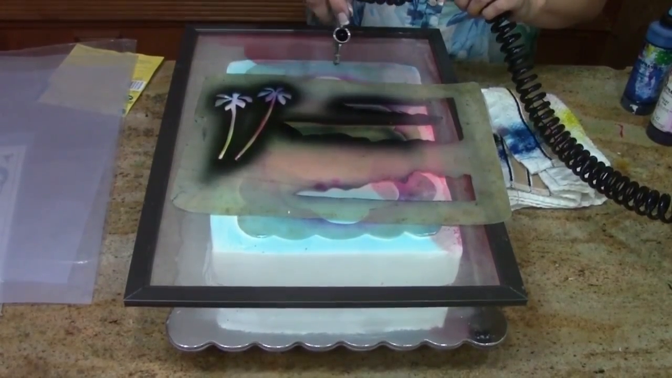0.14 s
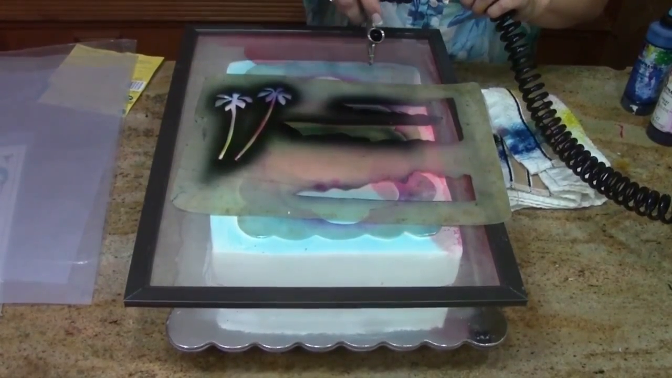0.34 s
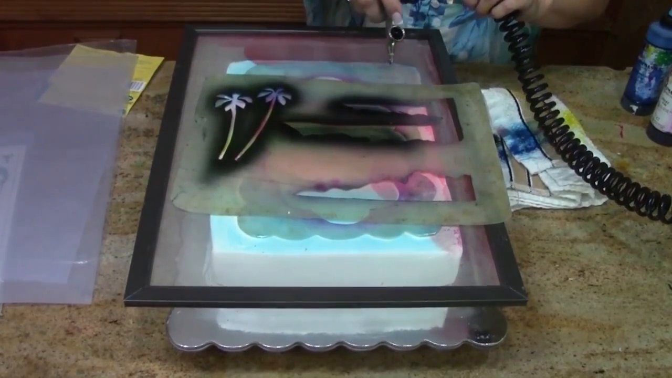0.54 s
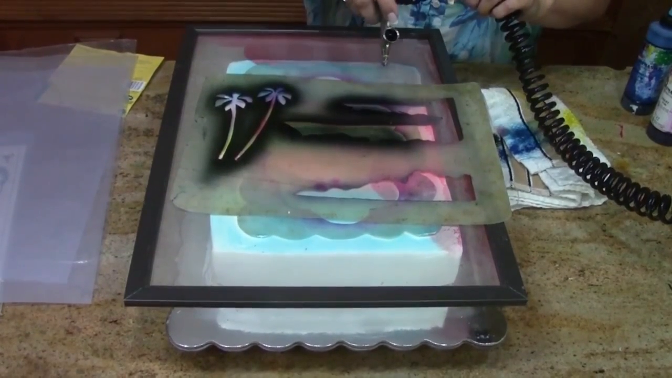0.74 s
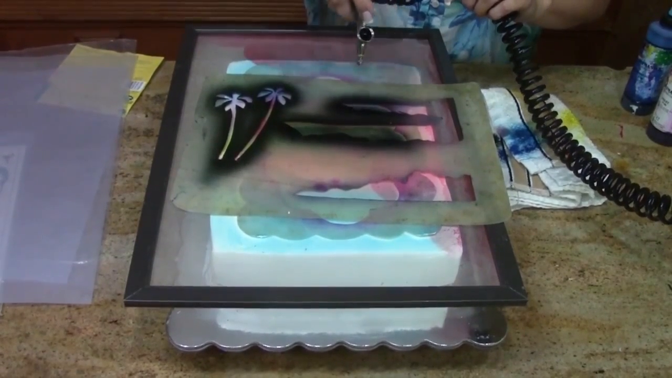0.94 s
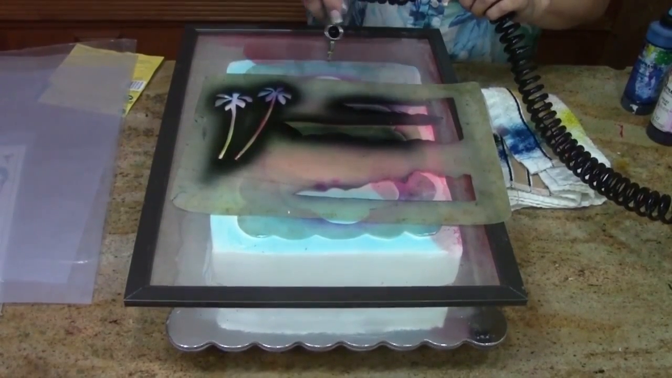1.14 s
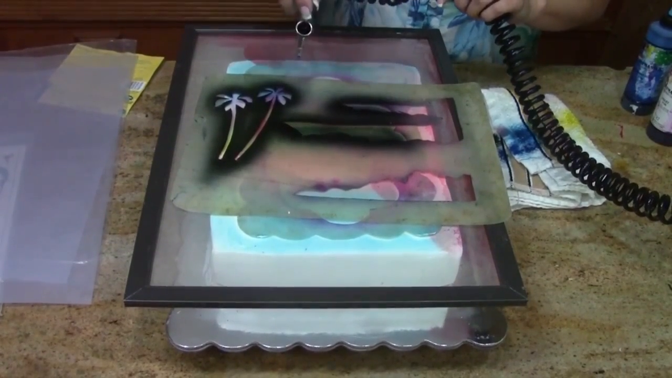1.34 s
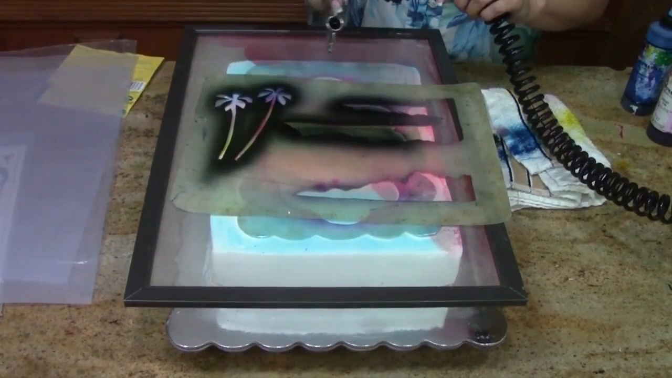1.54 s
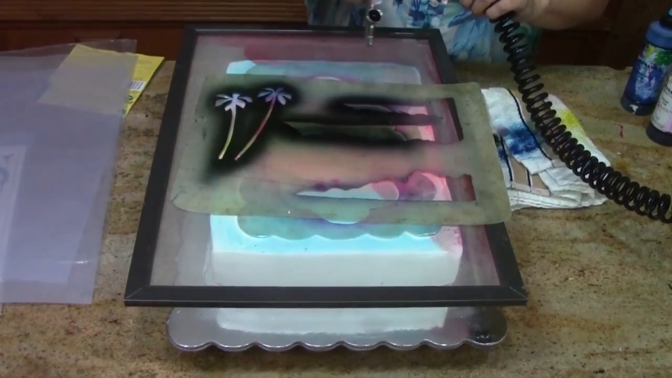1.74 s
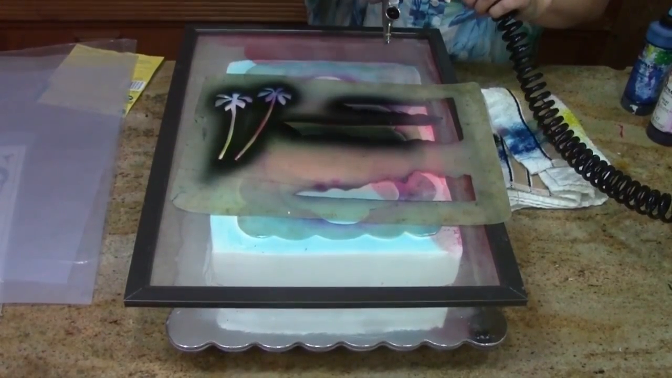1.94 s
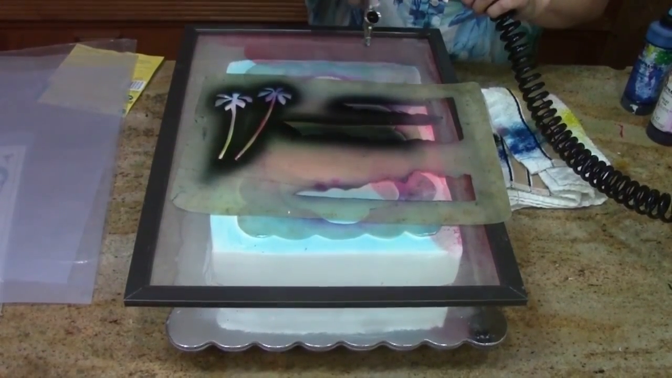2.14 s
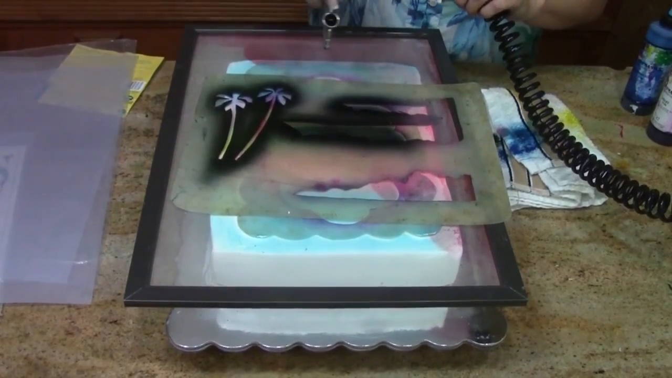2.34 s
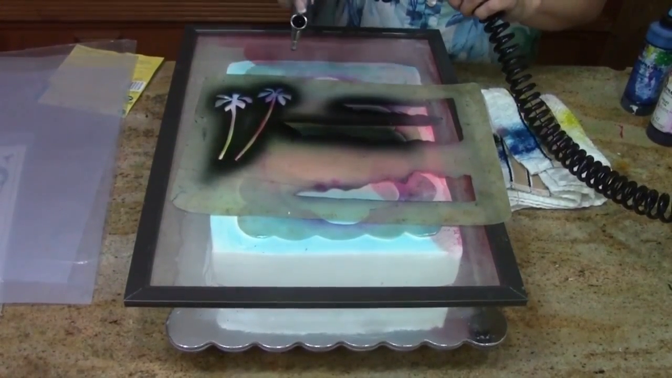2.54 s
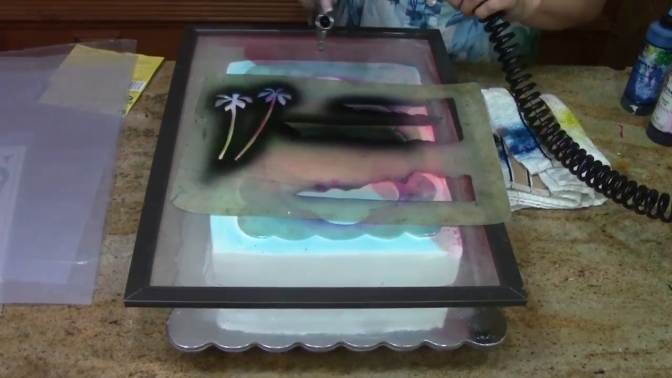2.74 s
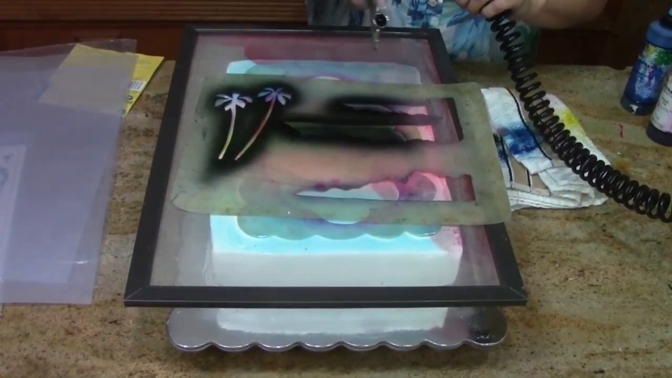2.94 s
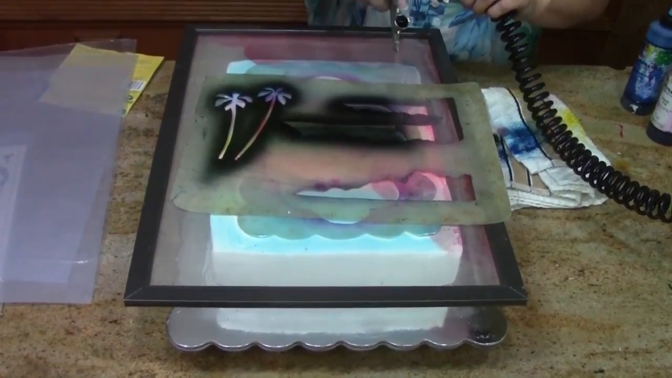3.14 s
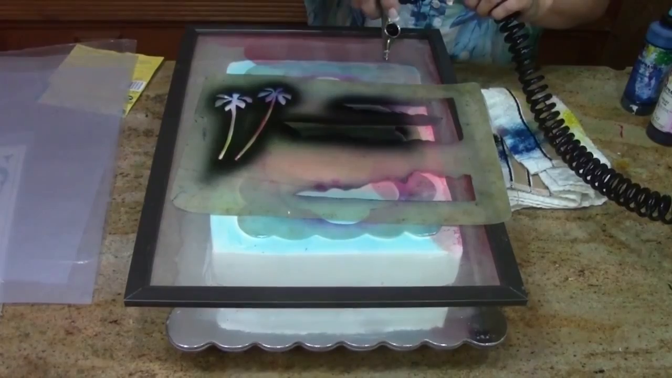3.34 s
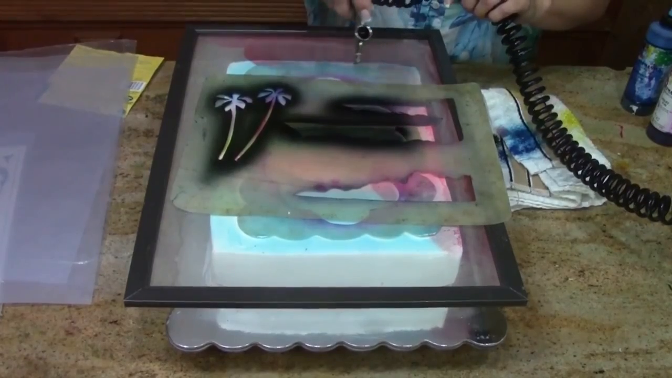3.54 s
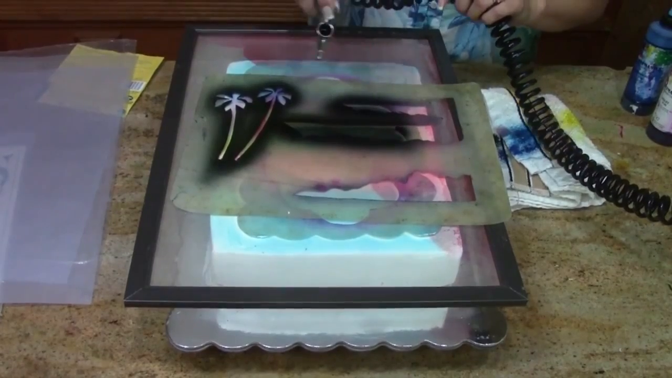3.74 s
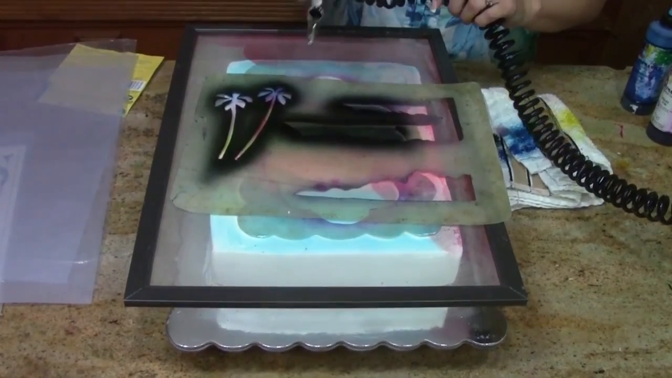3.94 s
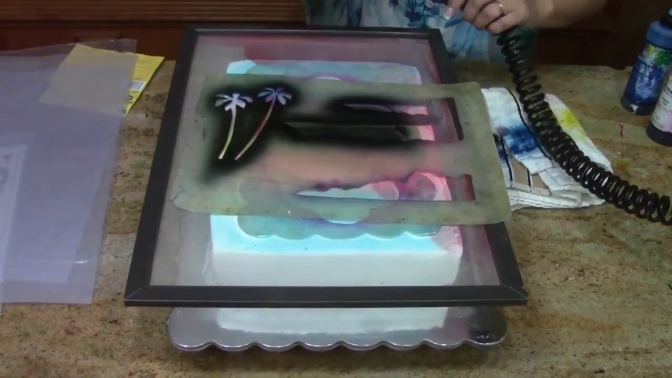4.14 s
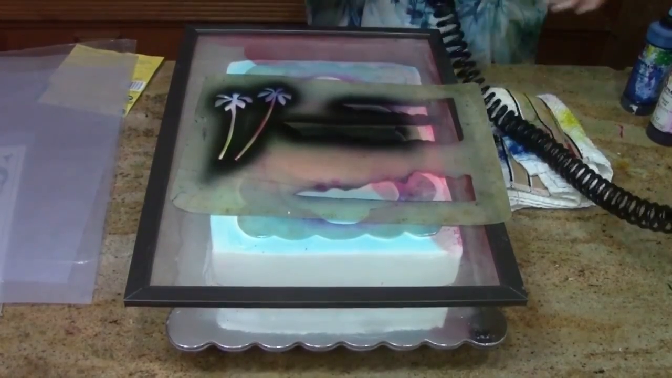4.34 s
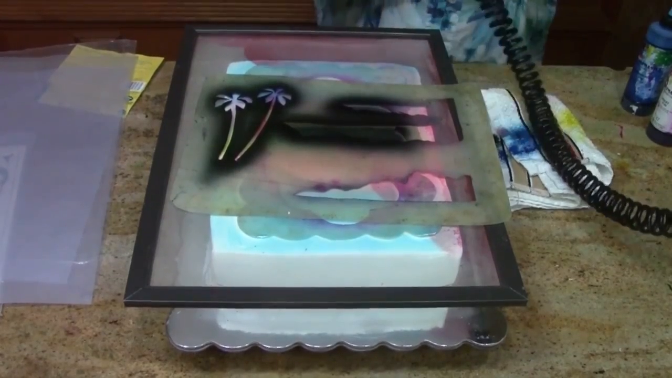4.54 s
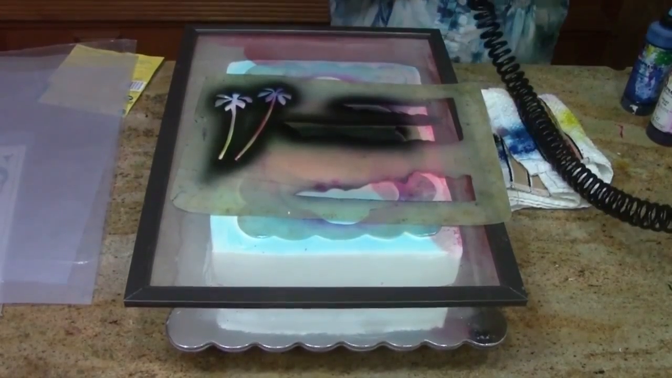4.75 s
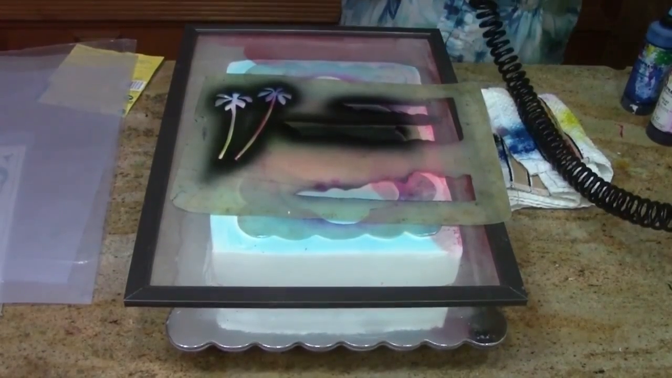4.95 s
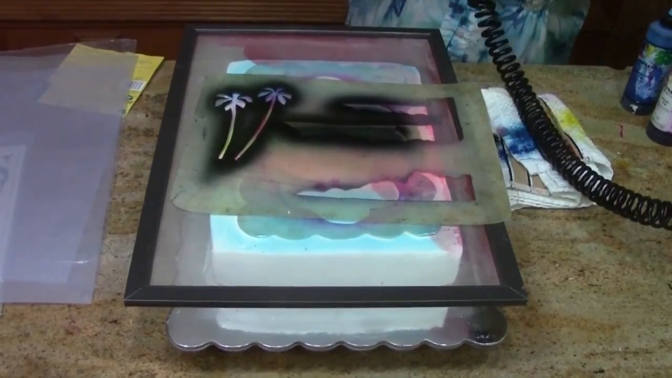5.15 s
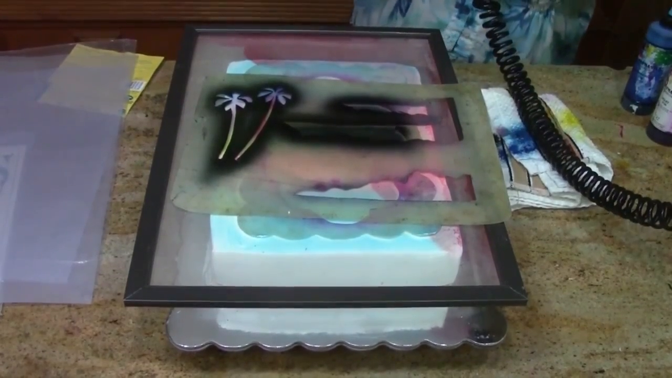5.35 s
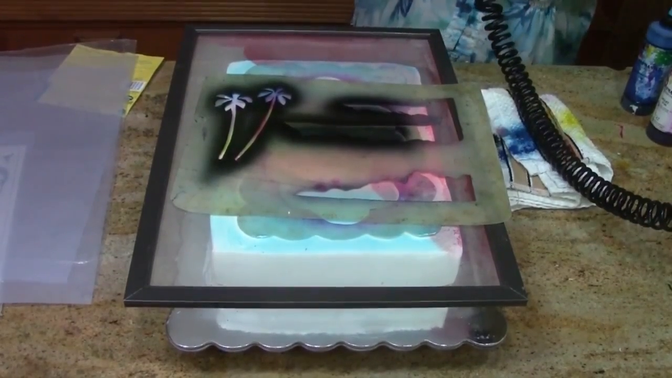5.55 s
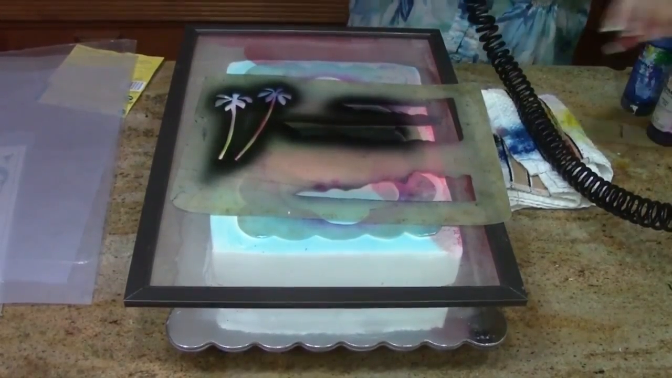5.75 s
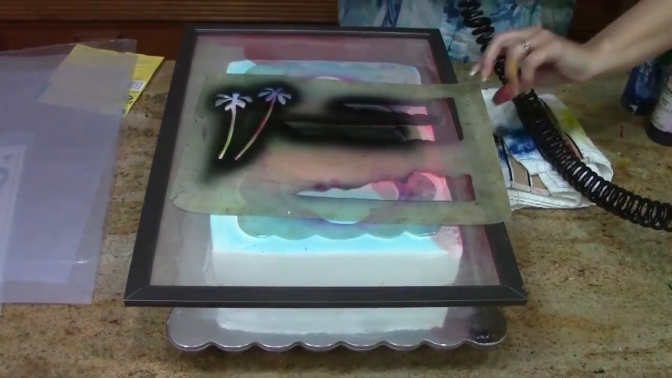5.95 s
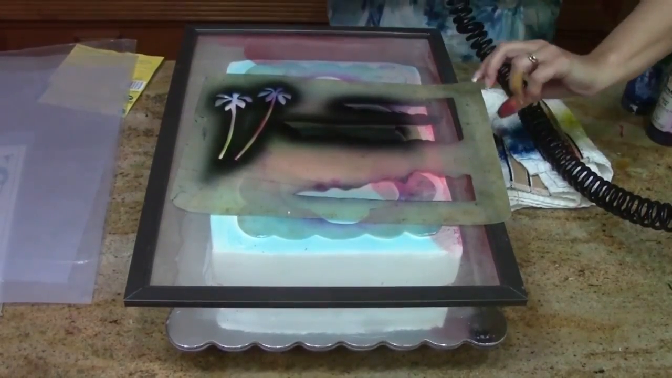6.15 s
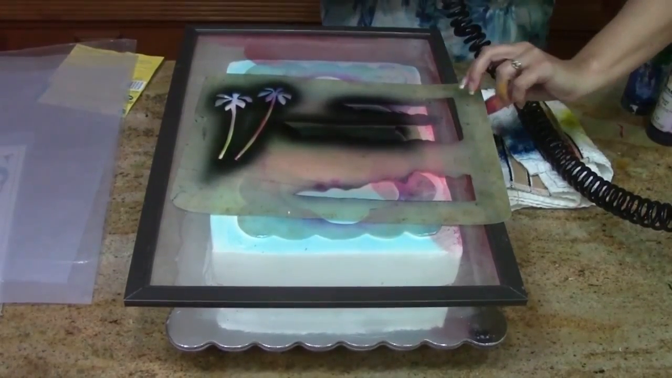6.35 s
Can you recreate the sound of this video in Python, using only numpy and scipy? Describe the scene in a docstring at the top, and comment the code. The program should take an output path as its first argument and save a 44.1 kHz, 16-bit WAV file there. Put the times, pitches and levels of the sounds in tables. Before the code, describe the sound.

In a quiet workroom, a small compressor hums and rattles steadily straight ahead while a close airbrush sprays with a bright hiss in about six sweeps. The airbrush is put aside and its hiss turns duller and more fluttery. Then a switch clicks, the motor winds down with brief honks, and one hard clack follows. Leftover air leaks softly from the hose and fades into room tone.

```python
"""An airbrush hisses close to the microphone, swept over a stencil on a cake in a workroom.
Its small diaphragm compressor, straight ahead too, drones and throbs as each turn knocks valves and casing.
The airbrush is put aside, and the pump strokes pulse the air harder once the hose pressure sags.
The pump is switched off and runs down with a few honks, something hard clacks once,
and the last air drains away over faint hums and room tone."""
import sys
import numpy as np
from scipy import signal
from scipy.fft import rfft, irfft, next_fast_len
from scipy.io import wavfile

SR = 44100
rng = np.random.default_rng(int(sys.argv[2]) if len(sys.argv) > 2 else 0)


def transcribe(signal):
    """Save signal, clipped to [-1, 1], as a 16-bit WAV file at the path in sys.argv[1]."""
    frames = np.atleast_2d(signal).T
    limited = np.clip(frames, -1, 1)
    pcm = np.round(limited * 32767).astype(np.int16)
    wavfile.write(sys.argv[1], SR, pcm)


N = 285760
TIME = np.arange(N) / SR
ASIDE_S, STOP_S = 4.01, 5.27   # the airbrush is put aside; the pump stops being driven
TURNS_PER_S = 27.924


# Hiss of the nozzle, close up: frequency_hz, density_db
NOZZLE_HISS = [(4500, -24.5), (6200, -12), (7200, -4), (8700, 2.5), (9600, 2.5), (10600, 2.5),
               (12000, -8.5)]
# Sizzle at the top of the jet: frequency_hz, density_db
TOP_SIZZLE = [(7500, -2), (9300, -25), (10000, 2), (10800, 5.5), (11500, 5), (12000, -3.5)]
def airbrush(turns):
    """A turbulent jet, louder on the stencil; with the hose slack, each pump stroke comes as a puff."""
    on_stencil, hiss_power, sizzle_power, rush_power = sweeps()
    aside = ramp(ASIDE_S, 0.81)
    puff = np.tanh(3 * (np.cos(2 * np.pi * (turns - .82)) - .35))
    taut_db, slack_db = 0.8, 3
    puff_db = (taut_db + (slack_db - taut_db) * aside) * (puff - puff.mean())
    treble_db = -4.5 * aside + 0.5 * drift(38)   # flutters, and drops once put aside
    jet = 0
    for free_air_db, power, spectrum in [(-40.5, hiss_power, NOZZLE_HISS), (-45.5, sizzle_power, TOP_SIZZLE)]:
        level = np.sqrt(from_db(free_air_db) ** 2 + power)
        jet += level * from_db(1.13 * drift(6.2)) * noise(spectrum, side_db=-47.5)
    jet *= from_db(puff_db + treble_db)
    body = rush(rush_power) * from_db(0.49 * puff_db - 0.5 * aside)
    body += splash(on_stencil) * from_db(treble_db)
    return (jet + body) * fade(STOP_S, 180)


# Passes of the jet over the stencil: start_s, end_s, hiss_db, sizzle_above_hiss_db, rush_db
STENCIL_SWEEPS = [(-0.1, 0.664, -39.5, 0.5, -43), (0.808, 1.28, -37.5, -4, -43.5),
                  (1.44, 1.993, -41, 1.5, -44), (2.167, 3.07, -48.5, 5.5, -43.5),
                  (3.1, 3.394, -41.5, -8, -42), (3.49, 4.053, -36.5, -4, -42.5)]
def sweeps(attack_s=0.1, release_s=0.078):
    """How fully the jet is on the stencil, and the power of the hiss, sizzle and rush it raises there."""
    on_stencil, hiss_power, sizzle_power, rush_power = np.zeros((4, N))
    for start_s, end_s, hiss_db, sizzle_above_hiss_db, rush_db in STENCIL_SWEEPS:
        gate = ramp(start_s - attack_s / 2, attack_s) * (1 - ramp(end_s - release_s / 2, release_s))
        on_stencil += gate
        hiss_power += gate * from_db(hiss_db) ** 2
        sizzle_power += gate * from_db(hiss_db + sizzle_above_hiss_db) ** 2
        rush_power += gate * from_db(rush_db) ** 2
    return on_stencil, hiss_power, sizzle_power, rush_power


# Broad rush of the air: frequency_hz, density_db
AIR_RUSH = [(900, 3), (1800, -1), (2500, -0.5), (3900, 1), (4700, 1.5), (5400, 0.5), (6300, 4), (7500, 3),
            (10000, -2)]
# Hollow tones of airbrush and stencil: pitch_hz, width_hz, gain_db
HOLLOW_TONES = [(2830, 45, -11), (4650, 37, 1.5), (4880, 43, 0), (5670, 47, -13)]
def rush(sweep_power, free_air_db=-43):
    """The rushing air excites hollow tones in the airbrush and stencil."""
    flow = noise(AIR_RUSH)
    hollows = sum(from_db(db) * resonance(flow, hz, width_hz) for hz, width_hz, db in HOLLOW_TONES)
    return np.sqrt(from_db(free_air_db) ** 2 + sweep_power) * (flow + hollows)


# Midrange splash of the jet: frequency_hz, density_db
AIR_SPLASH = [(1200, 1), (1950, -4.5), (2350, 2), (2750, -2), (3100, 1.5), (3700, -9), (5000, -13)]
# The jet catches a stencil edge: peak_s, half_length_s, level_db
EDGE_CATCHES = [(0.035, 0.032, -37.5), (1.417, 0.12, -43.5), (2.74, 0.11, -43.5)]
def splash(on_stencil, free_air_db=-48.5, sweep_db=-53.5):
    """The air splashes a little more on every sweep and flares where it catches an edge."""
    edge_power = sum((from_db(db) * swell(s, half_s)) ** 2 for s, half_s, db in EDGE_CATCHES)
    power = from_db(free_air_db) ** 2 + on_stencil * from_db(sweep_db) ** 2 + edge_power
    return np.sqrt(power) * noise(AIR_SPLASH)


# Short swells of noise, straight ahead: two spurts of air, then a faint scrape: peak_s, half_length_s,
# level_db, centre_hz, octave_away_db
NOISE_BURSTS = [(3.254, 0.017, -27.5, 10300, -16), (5.28, 0.031, -45, 5630, -24),
                (5.536, 0.015, -51, 1990, -21)]
def bursts():
    """Brief swells of noise, each around its own pitch: spurts of air, and a faint scrape near 2 kHz."""
    return sum(from_db(db) * swell(s, half_s) * noise([(hz / 2, skirt_db), (hz, 0), (hz * 2, skirt_db)])
               for s, half_s, db, hz, skirt_db in NOISE_BURSTS)


# Harmonics of the compressor's turning rate: multiple, relative_db
DRONE_HARMONICS = [(1, -21), (2, -18), (3, -12), (4, -13), (5, -33), (6, -5), (7, -8), (8, -11), (9, -13),
                   (10, -5), (11, -11), (12, -14), (13, -7), (14, -1), (15, -14), (16, -9), (17, -19),
                   (18, -13), (19, -33), (20, -21), (21, -10), (22, -14), (23, -16), (24, -2), (25, -2),
                   (26, 0), (27, -11), (28, -9), (29, -26), (30, -13), (31, -28), (32, -20), (33, -24),
                   (34, -23), (35, -10), (36, -12), (37, -15), (38, -14), (39, -22), (40, -24), (41, -22),
                   (42, -11), (43, -13), (44, -25), (45, -17), (46, -18), (47, -19), (48, -17), (49, -25),
                   (50, -22), (51, -30), (52, -27), (53, -22), (54, -8), (55, -13), (56, -32), (57, -19),
                   (58, -19)]
# Parts of the pump that sound in turn: lowest_hz, moment_turns, scatter_rad
PUMP_PARTS = [(20, .15, 2.5), (350, .53, .9), (460, .3, 1.8), (655, .34, .25), (740, .2, 1.6),
              (1420, .3, .6)]
def pump_drone(turns):
    """Each turn knocks the valves and the casing one after another; no two turns are quite alike."""
    shaky_turns = turns + .0009 * drift(12)
    lowest_hz, moment_turns, scatter_rad = np.transpose(PUMP_PARTS)
    drone = np.zeros(N)
    for multiple, (_, relative_db) in enumerate(DRONE_HARMONICS, 1):
        part = max(np.searchsorted(lowest_hz, multiple * TURNS_PER_S) - 1, 0)
        angle = 2 * np.pi * multiple * (shaky_turns - moment_turns[part])
        angle += scatter_rad[part] * rng.standard_normal()
        drone += from_db(relative_db + .5 * drift(6.9)) * np.cos(angle)
    lift_db = 0.28 + 0.75 * ramp(ASIDE_S, STOP_S - ASIDE_S)   # a little louder with the airbrush aside
    return from_db(lift_db) * rms_one(drone) * fade(STOP_S, 200)


# Irregular rattle of the pump: frequency_hz, density_db
PUMP_RATTLE = [(30, -14), (130, -9.5), (300, -6.5), (520, -4), (730, -1), (900, -26), (1100, 0.5),
               (1270, 2.5), (1450, -7.5), (1750, -12), (2000, -49)]
def pump_rattle(turns):
    """A rattle throbs once a turn and rings the casing; both die away after the switch-off."""
    rattle = noise(PUMP_RATTLE) * (1 + .3 * np.cos(2 * np.pi * (turns - .22)))
    casing = rms_one(ring(rattle, hz=753.5, width_hz=28))
    return (from_db(-11.5) * rattle + from_db(-18.5) * casing) * fade(STOP_S, 77)


def crank(coast_s):
    """Turns the pump has made so far: steady, then coasting towards rest."""
    speed = TURNS_PER_S * np.clip(1 - (TIME - STOP_S) / coast_s, 0, 1)
    return np.cumsum(speed) / SR


def coasting(turns, level_db, db_per_s, blur_hz, multiple):
    """The motor's strongest low tone lingers, blurred, and sinks as it slows."""
    angle = 2 * np.pi * multiple * turns
    tone = drift(blur_hz) * np.sin(angle) + drift(blur_hz) * np.cos(angle)
    return from_db(level_db) * ramp(STOP_S, 0.094) * fade(STOP_S, db_per_s) * tone


# Honks at the coasting pump's intake: start_s, length_s, pitch_hz, fundamental_db, second_relative_db
INTAKE_HONKS = [(5.324, 0.062, 375, -51, 9), (5.367, 0.05, 393, -32, -12), (5.394, 0.043, 378, -55, 12.5),
                (5.445, 0.059, 394, -47, -3), (5.507, 0.041, 360, -53, -3)]
def honks(sag, fourth_db, roughness, rasp_db):
    """The last slow strokes draw air through the intake reed, each rasping and sagging in pitch."""
    out = np.zeros(N)
    waver = roughness * drift(61.5)
    for start_s, length_s, pitch_hz, fundamental_db, second_db in INTAKE_HONKS:
        along = np.clip((TIME - start_s) / length_s, 0, 1)
        angle = 2 * np.pi * np.cumsum(pitch_hz * (1 - sag * (along - .5) + waver)) / SR
        overtones = from_db(second_db) * np.sin(2 * angle) + from_db(fourth_db) * np.sin(4 * angle)
        tone = np.sin(angle) + overtones * from_db(rasp_db * drift(89))
        out += from_db(fundamental_db) * np.abs(np.sin(np.pi * along ** 0.72)) * tone
    return out


# The switch, a tick and a hard clack, out in the room: start_s, force_db
CLACK_HITS = [(5.2592, -5), (5.449, -22), (5.5947, 0)]
# Modes that each hit rings: pitch_hz, width_hz, gain_db
STRUCK_MODES = [(1340, 450, -2), (2410, 580, 2.5), (3130, 690, 2.5), (3670, 890, -3), (4450, 980, 1),
                (5400, 1500, -6), (6660, 970, 2), (9700, 4000, -3.5)]
def clacks(gain_db, contact_s, grit_db):
    """A sharp contact with a little grit rings a few well damped modes."""
    force = np.zeros(N)
    for start_s, force_db in CLACK_HITS:
        grit = rng.standard_normal(N) * np.exp(-np.abs(TIME - start_s) / contact_s) * (TIME >= start_s)
        force += from_db(force_db + grit_db) * grit / np.linalg.norm(grit)
        force[round(start_s * SR)] += from_db(force_db)
    # neighbouring modes swing in opposite directions and merge into one broad clack
    modes = [(-1) ** k * from_db(db) * ring(force, hz, width_hz)
             for k, (hz, width_hz, db) in enumerate(STRUCK_MODES)]
    return from_db(gain_db) * sum(modes)


# Air draining from the hose, close up: frequency_hz, density_db
HOSE_LEAK = [(500, -0.5), (1200, -2.5), (1800, -5), (2500, -4), (4000, -4.5), (6000, -2.5), (8300, -2),
             (9500, -1.5), (10500, -1), (12000, -3.5)]
def leak(level_db, attack_s, db_per_s):
    """Once the pump stops, the air left in the hose escapes, ever more weakly."""
    envelope = ramp(STOP_S - attack_s, attack_s) * fade(STOP_S, db_per_s)
    return from_db(level_db) * envelope * noise(HOSE_LEAK)


# A faint ring far in the background: peak_s, half_length_s, level_db, pitch_hz, width_hz
THIN_TONE = (5.5, 1.1, -70.5, 1308, 48)
def faint_ring():
    """A thin tone swells and fades in the quiet."""
    peak_s, half_s, level_db, pitch_hz, width_hz = THIN_TONE
    tone = rms_one(ring(rng.standard_normal(N), pitch_hz, width_hz))
    return from_db(level_db) * swell(peak_s, half_s) * tone


# Faint hums in the workroom: pitch_hz, level_db, end_s
ROOM_HUMS = [(92.1, -58.5, 5.4), (147, -65.5, 5.3), (118.9, -66.5, 6.6)]
# Room tone all around the microphone: frequency_hz, density_db
WORKROOM_TONE = [(20, 22.5), (42, -3), (85, 19), (150, 7.5), (260, 8.5), (450, 1), (1000, -11),
                 (1330, -14.5), (2000, -33)]
def background(tone_db, side_db):
    """Faint wavering hums over the diffuse quiet of the room."""
    hums = np.zeros(N)
    for pitch_hz, level_db, end_s in ROOM_HUMS:
        level = from_db(level_db + drift(15)) * fade(end_s, 120)
        hums += level * np.sqrt(2) * np.sin(2 * np.pi * (pitch_hz * TIME + rng.random()))
    return hums + from_db(tone_db) * noise(WORKROOM_TONE, side_db)


def surface_bounce(x, lag_s, sway_s, echo_db):
    """The hiss also reaches the microphone off the work surface; the detour changes as the hand moves."""
    lag = np.maximum(lag_s + sway_s * drift(0.68), 0)
    return x + from_db(echo_db) * np.array([np.interp(TIME - lag, TIME, channel) for channel in x])


def room(x, wet_db, wall_hz, t60_s=0.37):
    """Direct sound at the microphone plus a diffuse tail, dulled by the walls."""
    t = TIME[:SR]
    tail = rng.standard_normal(SR) * from_db(-60 * t / t60_s) * np.clip(t / 0.0016 - .5, 0, 1)
    tail = signal.sosfilt(signal.butter(1, wall_hz, fs=SR, output="sos"), tail / np.linalg.norm(tail))
    return x + from_db(wet_db) * signal.fftconvolve(x, tail)[:N]


def from_db(db):
    """Decibels to gain."""
    return 10 ** (np.asarray(db) / 20)


def rms_one(x):
    """Scale to unit power."""
    return x / np.sqrt(np.mean(x ** 2) + 1e-20)


def drift(rate_hz):
    """A slow random wander of rms 1."""
    step = 40
    pole = np.exp(-2 * np.pi * step * rate_hz / SR)
    slow = signal.lfilter([1], [1, -2 * pole, pole * pole], rng.standard_normal(N // step + 2002))[2000:]
    return np.interp(np.arange(N) / step, np.arange(len(slow)), rms_one(slow))


def noise(spectrum, side_db=-55):
    """Stereo noise of rms 1 with the given spectrum, rolled off beyond its ends."""
    size = next_fast_len(N)
    log_hz = np.log(np.fft.rfftfreq(size, 1 / SR) + 1)
    hz, db = np.transpose(spectrum)
    outside = np.maximum(np.log(hz[0]) - log_hz, 0) + np.maximum(log_hz - np.log(hz[-1]), 0)
    colour = from_db(np.interp(log_hz, np.log(hz), db)) * np.exp(-2 * outside)
    mid, side = irfft(rfft(rng.standard_normal((2, size))) * colour, size)[:, :N]
    return rms_one(mid + from_db(side_db) * side * [[1], [-1]])


def resonance(x, hz, width_hz):
    """Two-pole resonance with gain 1 at its peak."""
    r = np.exp(-np.pi * width_hz / SR)
    poles = [1, -2 * r * np.cos(2 * np.pi * hz / SR), r * r]
    return signal.lfilter(np.array([1, 0, -1]) * (1 - r * r) / 2, poles, x + 1e-18)


def ring(x, hz, width_hz):
    """The same resonance twice, for steeper skirts."""
    return resonance(resonance(x, hz, width_hz), hz, width_hz)


def ramp(start_s, length_s):
    """A smooth rise from 0 to 1."""
    return np.sin(np.pi / 2 * np.clip((TIME - start_s) / length_s, 0, 1)) ** 2


def swell(peak_s, half_s):
    """A bell-shaped rise and fall around a moment."""
    return np.exp(-.5 * ((TIME - peak_s) / half_s) ** 2)


def fade(end_s, db_per_s):
    """Full level until end_s, then a steady decay."""
    return from_db(-db_per_s * np.maximum(TIME - end_s, 0))


def scene():
    """Spray and pump close and straight ahead of the microphone; honks and clacks ring in the room."""
    turns = crank(coast_s=1.5)
    pump = from_db(-36) * (pump_drone(turns) + pump_rattle(turns))
    pump += coasting(turns, level_db=-57, db_per_s=31, blur_hz=25, multiple=14)
    air = airbrush(turns) + bursts() + leak(level_db=-43, attack_s=0.094, db_per_s=14)
    air = surface_bounce(air, lag_s=0.00092, sway_s=0.000209, echo_db=-15.5)
    run_down = room(honks(sag=.06, fourth_db=-20, roughness=.012, rasp_db=3), wet_db=-14, wall_hz=3000)
    knocks = room(clacks(gain_db=0.5, contact_s=0.0033, grit_db=-4.0), wet_db=3.5, wall_hz=4530)
    return air + pump + run_down + knocks + faint_ring() + background(tone_db=-60.0, side_db=-9)


def record(dry):
    """The microphone signal is cut steeply above 11.9 kHz."""
    return signal.sosfilt(signal.ellip(12, .1, 80, 11900, fs=SR, output="sos"), dry)


dry = scene()
out = record(dry)
transcribe(out)
```